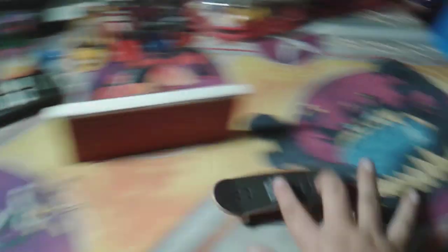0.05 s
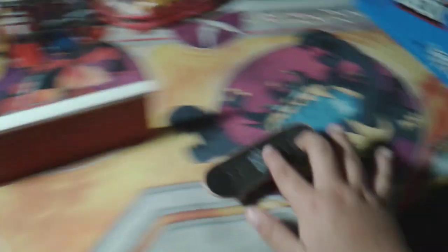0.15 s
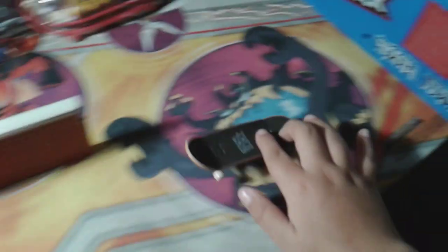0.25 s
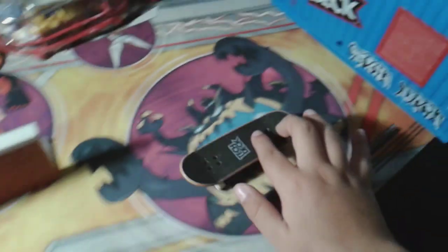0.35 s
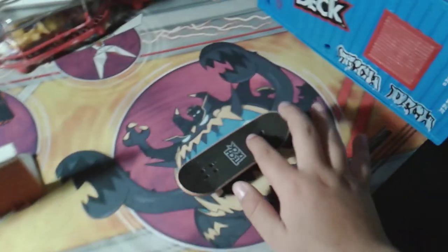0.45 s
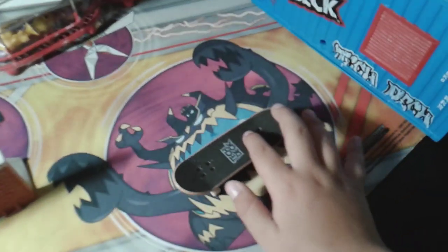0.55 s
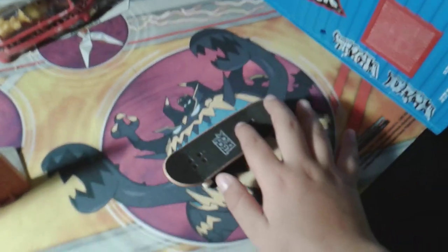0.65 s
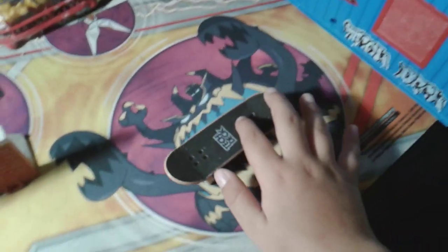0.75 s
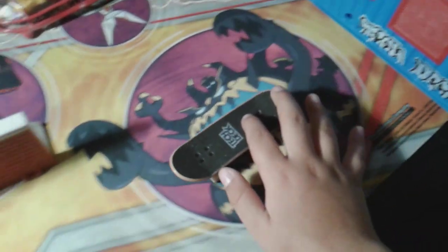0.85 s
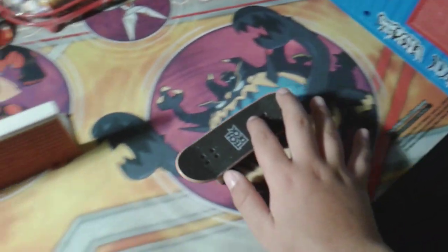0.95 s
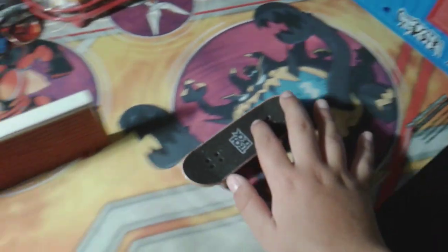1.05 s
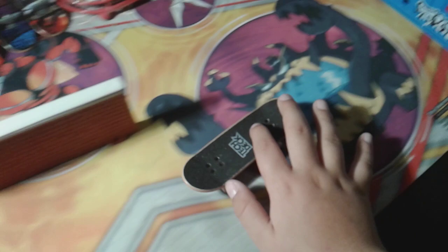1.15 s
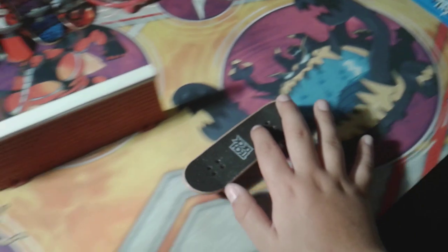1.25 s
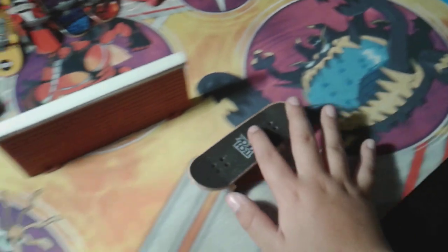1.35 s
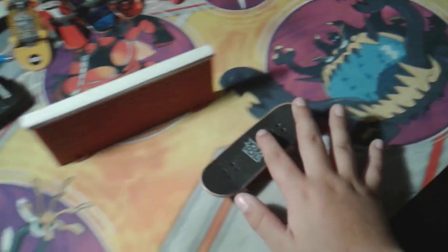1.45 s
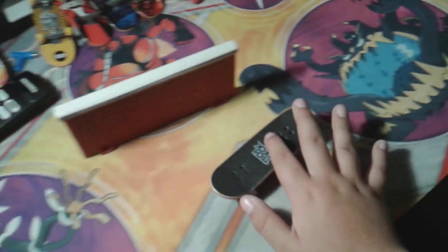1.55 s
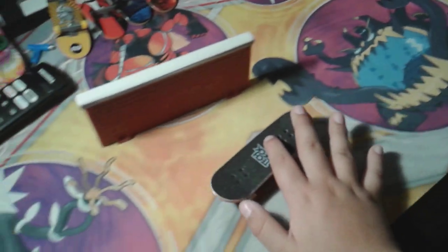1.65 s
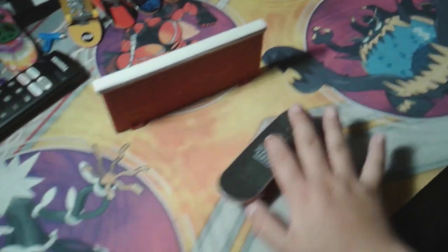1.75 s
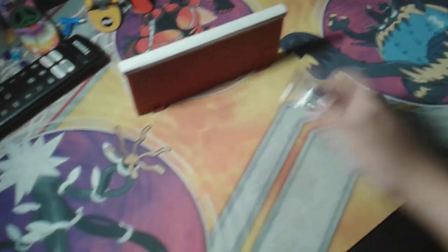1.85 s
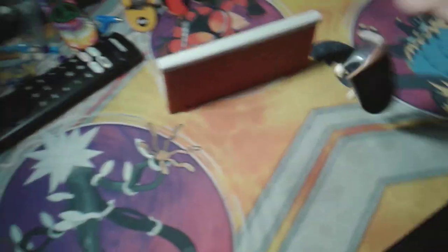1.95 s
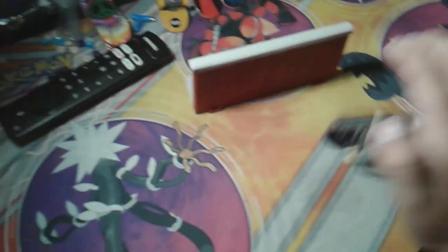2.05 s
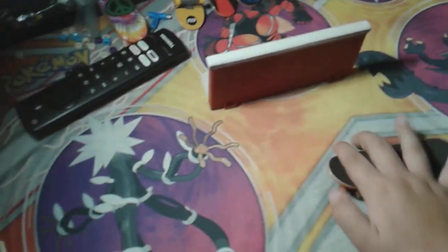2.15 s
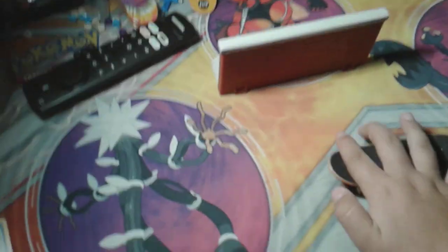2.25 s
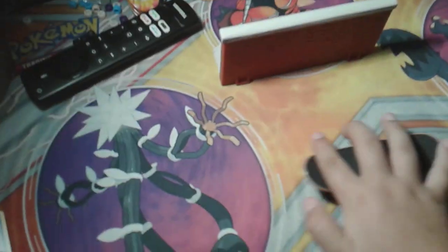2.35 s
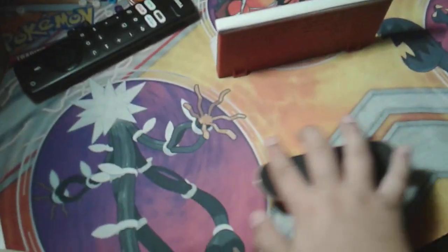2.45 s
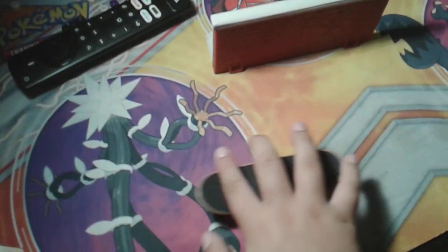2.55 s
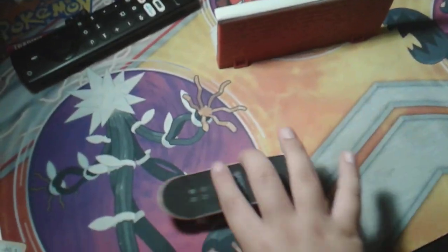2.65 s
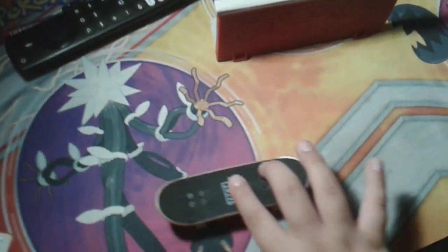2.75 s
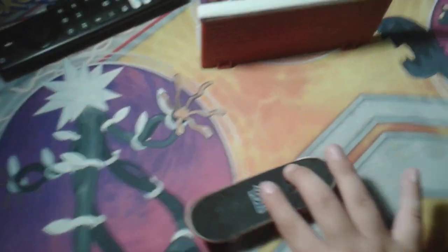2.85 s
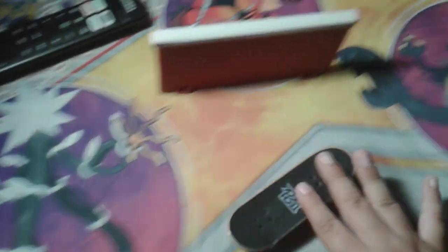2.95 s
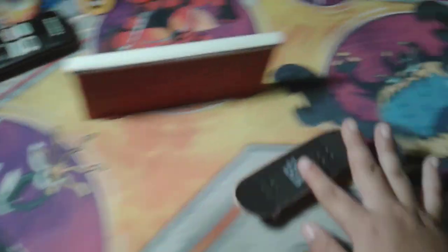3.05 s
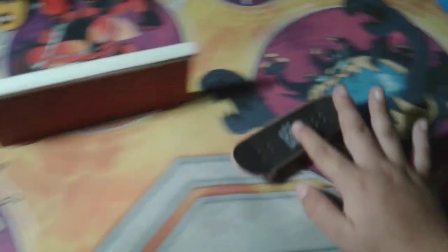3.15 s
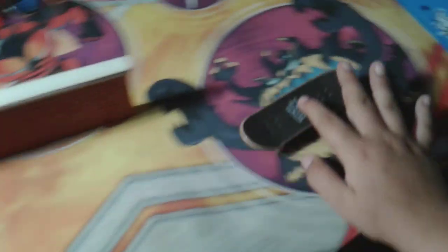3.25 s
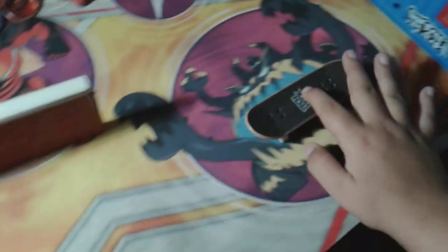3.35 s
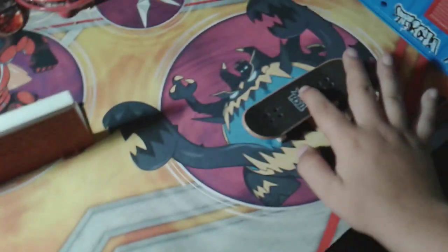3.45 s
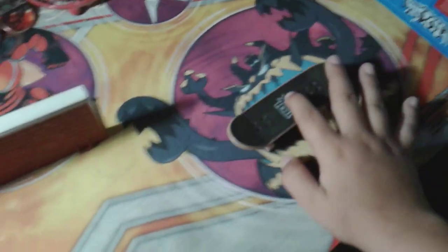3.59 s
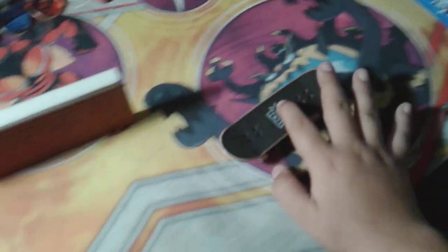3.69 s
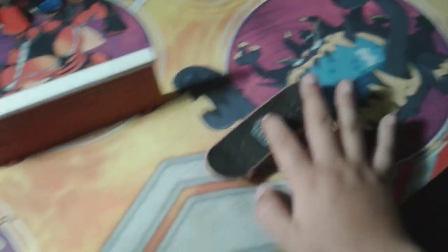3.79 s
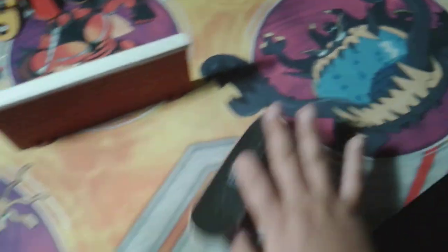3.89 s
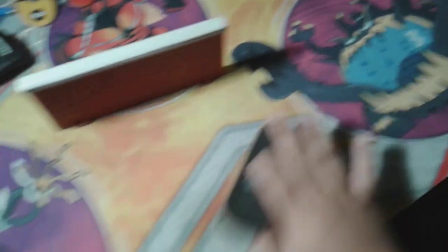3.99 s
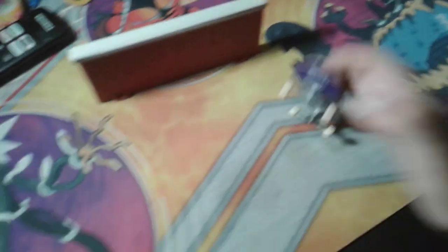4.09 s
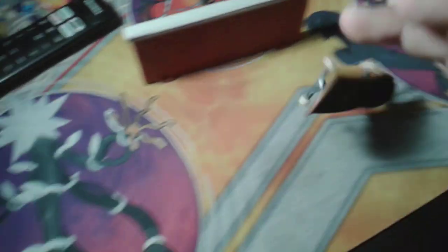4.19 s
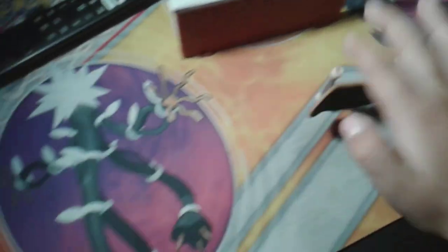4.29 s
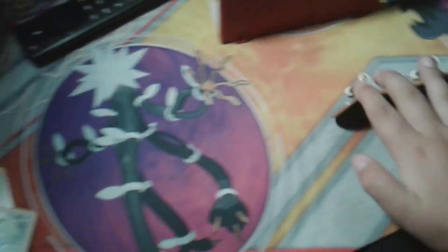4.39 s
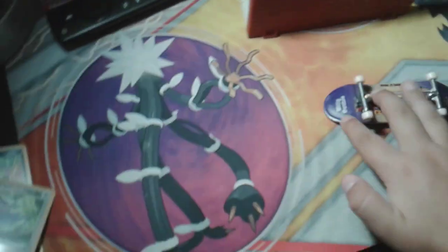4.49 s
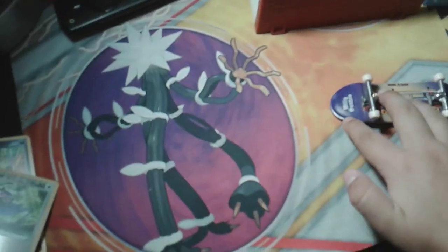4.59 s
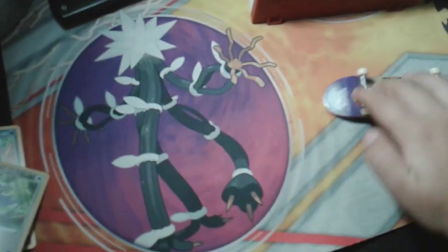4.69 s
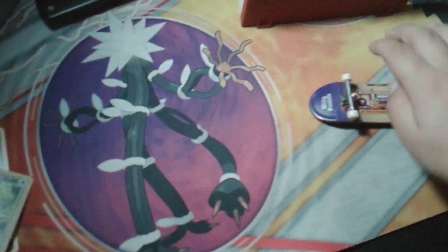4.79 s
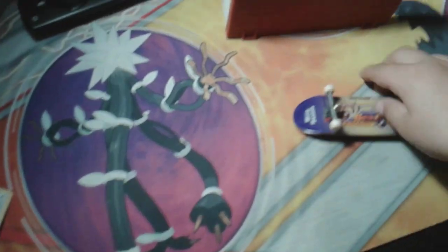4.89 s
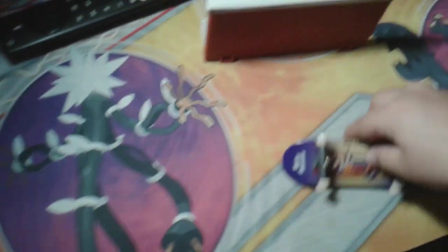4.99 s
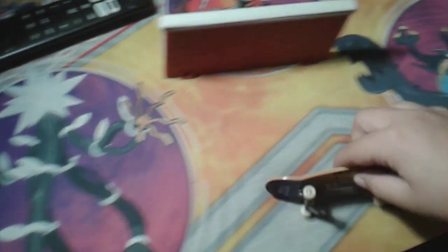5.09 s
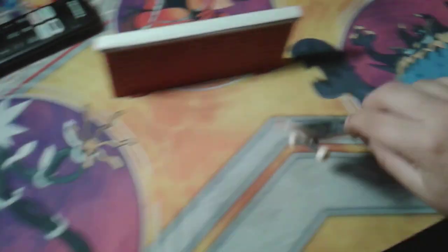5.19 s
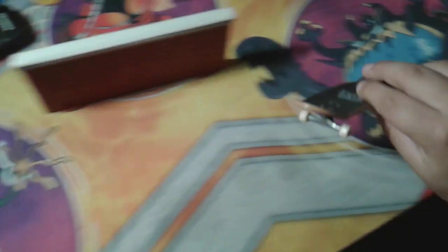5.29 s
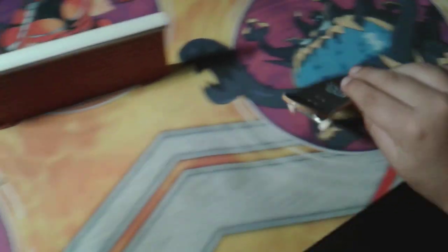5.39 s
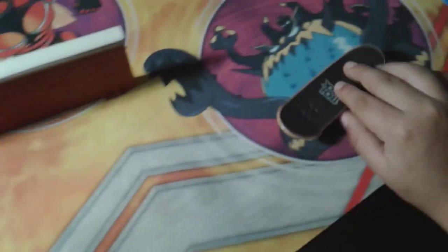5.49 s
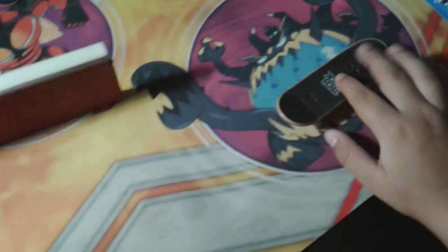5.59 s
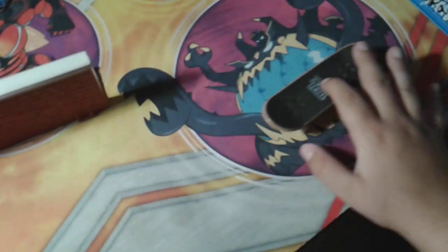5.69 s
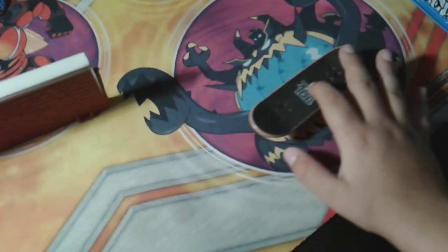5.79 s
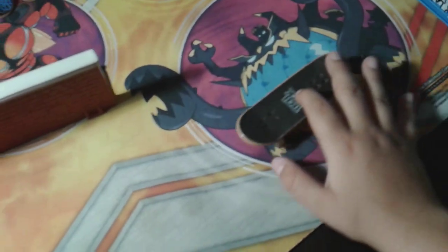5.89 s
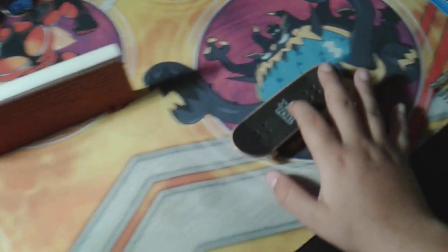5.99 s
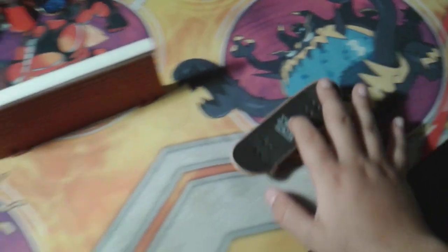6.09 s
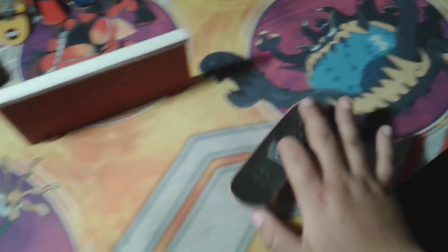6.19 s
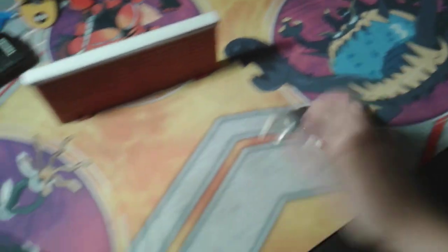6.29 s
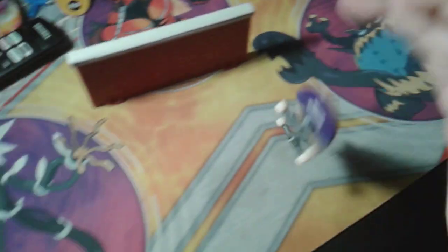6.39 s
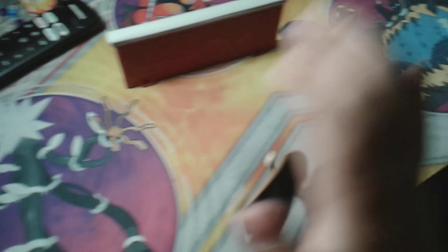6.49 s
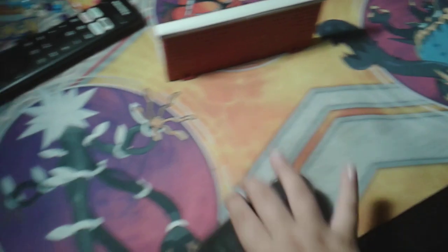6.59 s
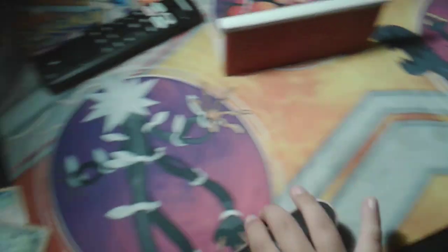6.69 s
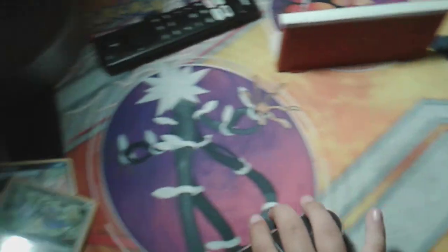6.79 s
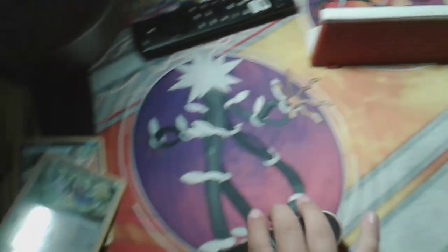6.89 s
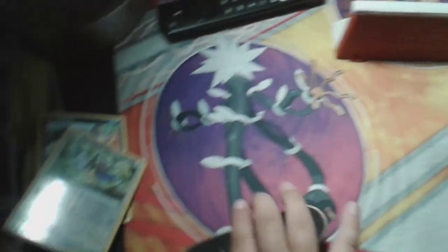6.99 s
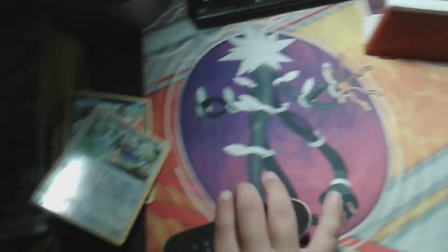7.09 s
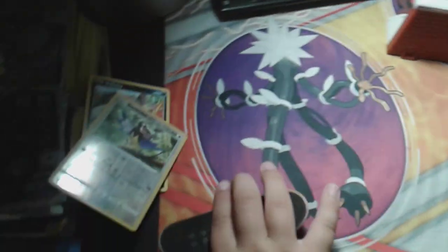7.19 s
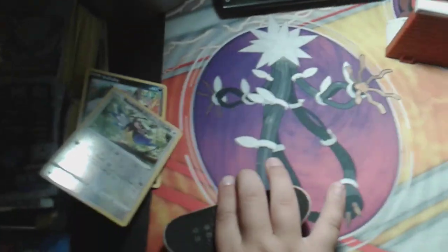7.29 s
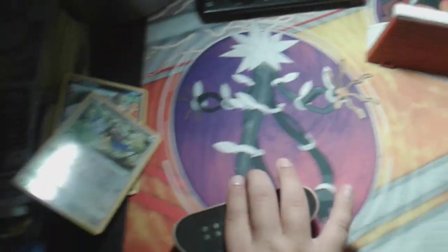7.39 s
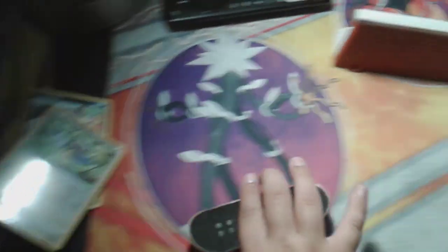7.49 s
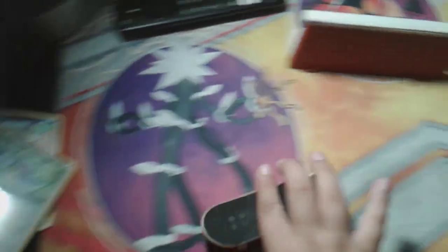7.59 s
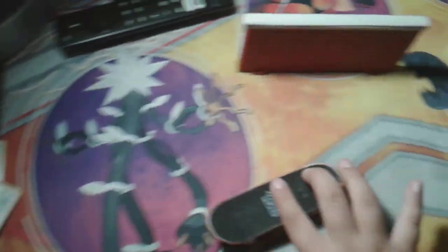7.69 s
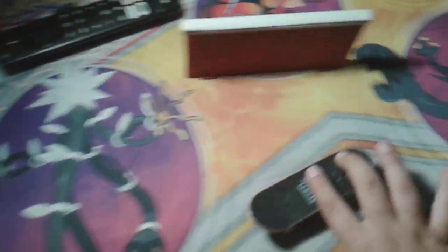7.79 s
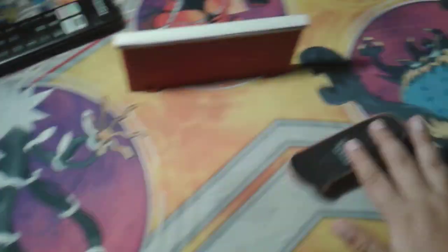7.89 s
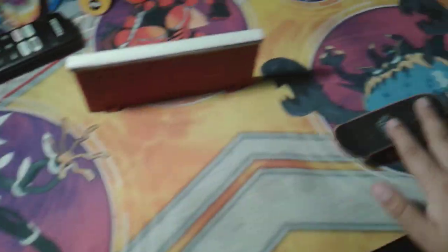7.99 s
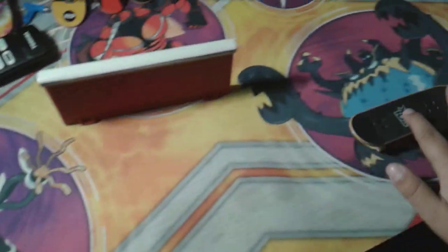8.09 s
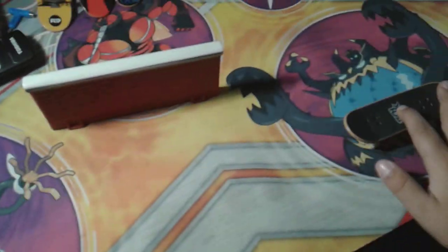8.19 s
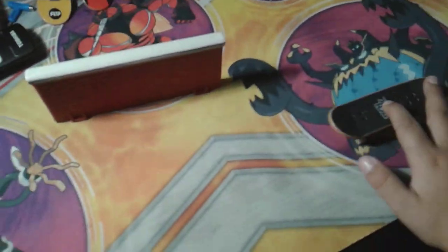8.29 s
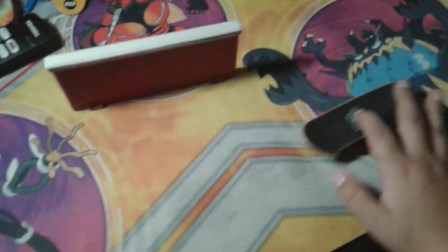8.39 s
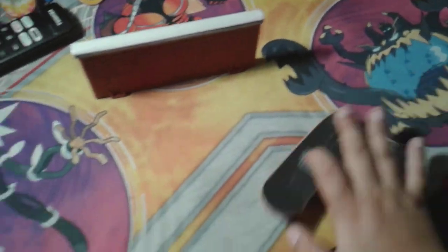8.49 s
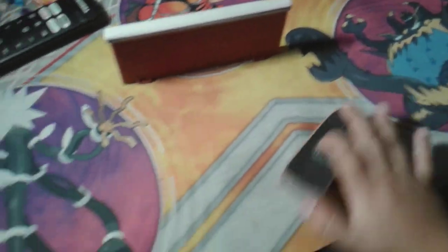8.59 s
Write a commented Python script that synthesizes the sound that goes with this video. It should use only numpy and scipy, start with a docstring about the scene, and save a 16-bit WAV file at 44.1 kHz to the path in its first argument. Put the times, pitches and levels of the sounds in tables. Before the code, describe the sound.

A tiny finger-sized skateboard rolls, scuffs and clacks on a cloth-covered table, with sharp flip landings and quiet wheel whirr in a small room.

```python
"""A small quiet room: a fingerboard is rolled and flipped on a cloth mat on a table, close to the microphone.
Tail pops and landings excite the decaying modes of the table top, a low thud under the clack of the
wooden deck and loose metal trucks, which are bursts of tiny contacts sent through resonances.
Between tricks the little wheels whirr over the mat and the board scuffs under the fingers, built from
resonant grains and noise; a short room echo, soft hiss and a low drone lie around it all."""
import sys
import numpy as np
from scipy import signal
from scipy.fft import rfft, irfft, next_fast_len
from scipy.io import wavfile

SR = 44100
rng = np.random.default_rng(int(sys.argv[2]) if len(sys.argv) > 2 else 0)


def dump_mix(stems):
    """Bounce the given channels to the path in sys.argv[1] as a 16-bit WAV at rate SR."""
    frames = np.atleast_2d(stems).T  # one column per channel
    limited = np.clip(frames, -1, 1)  # hard clip at full scale
    pcm = np.round(limited * 32767).astype(np.int16)
    wavfile.write(sys.argv[1], SR, pcm)


N = 381465
TIME = np.arange(N) / SR
HIT_TIME = np.arange(SR // 3) / SR   # time axis of one hit or echo, s

# the board hits the table in a pop or a landing; cushion is how far the mat holds the slap below the boom:
# (start_s, boom_db, cushion_db, wheels_db, deck_db, trucks_db)
BLOWS = [(0.459, -46.5, 13.5, -61, -55, -54.5), (0.5, -53.5, 13, -68, -71, -71),
         (1.532, -52, 23, -67, -76, -72), (1.9382, -42, 16.5, -48, -59.5, -58.5),
         (2.152, -40, 15, -55, -75, -51.5), (2.182, -32.5, 9.5, -44.5, -38.5, -33),
         (2.2421, -38.5, 15, -43.5, -41.5, -34), (4.152, -46, 12.5, -52, -58.5, -53),
         (4.321, -44, 13.5, -55, -64, -54.5), (4.3537, -32.5, -0.5, -40.5, -41, -36),
         (4.4374, -29.5, 2, -35, -36, -25), (4.56, -46, 24, -61, -60, -53),
         (4.959, -40.5, 42, -66.5, -69, -64.5), (5.52, -54, 13.5, -63, -57.5, -51),
         (5.593, -47, 13.5, -58.5, -58, -48.5), (6.4035, -41.5, 13.5, -63, -56, -52),
         (6.602, -38, 17, -55.5, -57.5, -48.5), (6.652, -34, 12, -50.5, -42.5, -41),
         (6.7217, -31.5, 6.5, -34.5, -33, -33), (8.054, -44.5, 20.5, -51.5, -68, -54),
         (8.073, -49.5, 22, -62, -61, -55)]
# resonances of the axles and their small parts: (pitch_hz, width_hz, level_db)
AXLE_RESONANCES = [(3985, 580, -11), (4720, 450, -7.5), (5880, 490, -4.5), (6840, 617, 0), (7190, 630, -2),
                   (8170, 630, -15), (12650, 4100, -26)]


def from_db(db):
    """Decibels to gain."""
    return 10 ** (np.asarray(db) / 20)


def rms_one(x, size=None):
    """Scale so that the first `size` samples have rms 1."""
    return x / np.sqrt(np.mean(x[:size] ** 2) + 1e-20)


def add(out, start_s, x):
    """Mix x into out from start_s on."""
    at = max(round(start_s * SR), 0)
    out[at:at + len(x)] += x[:max(len(out) - at, 0)]


def colour(x, spectrum):
    """Give a noise a smooth spectrum, drawn through the listed points on a log frequency axis."""
    hz, db = np.transpose(spectrum)
    size = 2 * next_fast_len(len(x) // 2 + 1)
    bins_hz = np.maximum(np.fft.rfftfreq(size, 1 / SR), 1)
    gain = from_db(np.interp(np.log(bins_hz), np.log(hz), db))
    return irfft(rfft(x, size) * gain)[:len(x)]


def drift(rate_hz):
    """Smoothly joined random values around zero, rate_hz of them per second."""
    knots = rng.standard_normal(N // 20)
    return np.interp(TIME * rate_hz, np.arange(len(knots)), knots)


def resonate(x, body, vary_db=0):
    """Parallel resonances; where the body is touched changes the strength of each."""
    out = 0
    for k, (hz, width_hz, db) in enumerate(body):
        radius = np.exp(-np.pi * width_hz / SR)
        angle = 2 * np.pi * hz / SR
        sign = (-1) ** k
        gain = sign * from_db(db + vary_db * rng.standard_normal()) * (1 - radius ** 2) / 2
        poles = [1, -2 * radius * np.cos(angle), radius ** 2]
        out = out + gain * signal.lfilter([1, 0, -1], poles, x + 1e-18)
    return out


def high_pass(x, hz):
    """Small parts radiate no bass."""
    return signal.sosfilt(signal.butter(3, min(hz, .45 * SR), "high", fs=SR, output="sos"), x)


def band_pass(x, low_hz, high_hz):
    """Each part radiates only over its own range."""
    edges_hz = [low_hz, min(high_hz, .45 * SR)]
    return signal.sosfilt(signal.butter(3, edges_hz, "band", fs=SR, output="sos"), x)


def grains(per_s, spread_db, size):
    """Tiny contacts at random moments, of uneven force."""
    force = from_db(spread_db * np.minimum(rng.exponential(1, size), 4))
    happens = rng.random(size) < per_s / SR
    return happens * force * rng.choice([-1, 1], size)


def thuds():
    """Everything that shakes the table: (start_s, boom_db, cushion_db)."""
    # fingers press the board into the mat with a dull thump: (start_s, boom_db)
    presses = [(1.422, -58.5), (1.56, -54.5), (2.841, -55.5), (5.628, -49.5), (7.069, -59), (7.562, -56),
               (7.793, -53), (7.976, -48)]
    lag_s = .002   # the table top gives way just after the wheels touch
    press_cushion_db = 29
    blows = [(s + lag_s, boom, cushion) for s, boom, cushion, *_ in BLOWS]
    return blows + [(s, boom, press_cushion_db) for s, boom in presses]


def ring_share(start_s):
    """Share of the table's full ring time: the weight of the holding fingers shortens it."""
    tumbles_freely = 3.9 < start_s < 4.5   # one flip without hands
    return 1.05 if tumbles_freely else 0.83


def table(vary_db=4.0, swell_s=0.0051, thud_db=-2.5, thud_t60_s=.075, knock_trim_db=1.5):
    """The mat cushions each blow on the table top; the less it cushions, the louder the higher modes."""
    # modes of the table top; ring_share scales the ring time: (pitch_hz, level_db, t60_s)
    table_modes = [(110.8, -1, 0.094), (128.4, -5.5, .19), (167, -20, .1), (248, -20.5, 0.057),
                   (320.5, -3, 0.15), (345, -0.5, 0.071), (400.4, 3, .06), (440, -0.5, 0.091),
                   (615, -9, 0.26), (747, 0, 0.069), (778.4, 2, 0.071), (844, -2.5, 0.1), (929, -1, 0.08),
                   (1068, -7.5, .07), (1275, -6.5, .06)]
    knock_share = .72   # share of the cushioning that the middle modes feel
    out = np.zeros(N)
    hz, level_db, t60_s = np.transpose(table_modes)[:, :, None]
    swell = (1 - np.exp(-HIT_TIME * hz / (swell_s * hz[0]))) ** 2   # low modes swell more slowly
    waves = np.sin(2 * np.pi * hz * HIT_TIME) * swell
    register = np.digitize(hz[:, 0], [220, 570])   # 0 boom, 1 knock, 2 slap
    for start_s, boom_db, cushion_db in thuds():
        fall_db = -60 * HIT_TIME / ring_share(start_s)   # still to be divided by a t60
        struck = waves * from_db(level_db + fall_db / t60_s + vary_db * rng.standard_normal(hz.shape))
        boom = rms_one(struck[register == 0].sum(0), size=SR // 40)
        add(out, start_s, from_db(boom_db) * boom)
        knock_db = boom_db - knock_share * cushion_db + knock_trim_db
        slap_db = boom_db - cushion_db
        upper = [(1, knock_db, 305, 520), (2, slap_db, 680, 1300)]
        for k, db, low_hz, high_hz in upper:
            # a crowd of heavily damped modes fills the gaps between the clear ones
            noise = rng.standard_normal(len(HIT_TIME)) * from_db(fall_db / thud_t60_s)
            thud = rms_one(band_pass(noise, low_hz, high_hz))
            clear = rms_one(struck[register == k].sum(0))
            body = clear + from_db(thud_db) * thud
            add(out, start_s, from_db(db) * rms_one(body, size=SR // 55))
    return high_pass(out, hz=45)   # the table top is too small to radiate deep bass


def loose_deck(start_s=4.44, pitch_hz=327, peak_db=-30, t60_s=0.3):
    """Landing with no hand on it, the deck is free to ring in its first bending mode."""
    out = np.zeros(N)
    ring = np.sin(2 * np.pi * pitch_hz * HIT_TIME)
    add(out, start_s, ring * from_db(peak_db - 60 * HIT_TIME / t60_s))
    return out


def clacks():
    """Everything that shakes the board: (start_s, wheels_db, deck_db, trucks_db, truck_lag_s)."""
    # the loose trucks clack without a blow on the table: (start_s, trucks_db)
    board_clacks = [(0.205, -66.5), (0.242, -65), (0.528, -63), (0.541, -73), (0.804, -68.5), (1.417, -72),
                    (1.556, -70.5), (1.999, -64.5), (2.014, -68), (2.1722, -53), (2.226, -49.5),
                    (2.26, -46.5), (2.2993, -56), (2.465, -71), (3.075, -68), (4.0, -64), (4.219, -62.5),
                    (4.428, -44), (4.521, -50.5), (4.5448, -49), (4.599, -57), (5.024, -65), (5.133, -67.5),
                    (5.164, -63), (5.248, -74), (5.48, -61), (5.6382, -55), (6.325, -69), (6.455, -61),
                    (6.648, -52), (6.674, -43.5), (6.699, -52.5), (6.712, -40.5), (6.7365, -37),
                    (6.7877, -56.5), (6.8195, -58.5), (6.86, -61.5), (6.9547, -62.5), (7.529, -74.5),
                    (7.893, -68), (8.145, -72.5), (8.55, -69), (8.591, -63)]
    # the harder the blow, the sooner the loose trucks follow the wheels: (trucks_db, lag_s)
    truck_lag = [(-56.5, 0.0025), (-38, 0.00065)]
    shared_db = -9   # a clack without a blow reaches wheels and deck only weakly
    lag_db, lag_s = np.transpose(truck_lag)
    blows = [(s, wheel, deck, truck, np.interp(truck, lag_db, lag_s))
             for s, _, _, wheel, deck, truck in BLOWS]
    loose = [(s, db + shared_db, db + shared_db, db, lag_s[-1]) for s, db in board_clacks]
    return blows + loose


def board(rattle_s=0.0037, rise_s=0.00086, settle_db=-24, settle_s=.016, crack_db=-5.5):
    """A clack is a burst of contacts: wheels and deck, the loose trucks just after, then faint chatter."""
    # knock of a wheel against its axle: (pitch_hz, width_hz, level_db)
    wheel_knock = [(1680, 400, -3), (1924, 210, -2.5), (2248, 290, -2.5)]
    # resonances of the wooden deck: (pitch_hz, width_hz, level_db)
    deck_resonances = [(2600, 290, 5.5), (3296, 270, 3.5), (4000, 450, -3)]
    # resonances of the metal trucks: (pitch_hz, width_hz, level_db)
    truck_resonances = [(5240, 460, -7.5), (5730, 430, -7), (6340, 450, 0), (6960, 610, 0), (7460, 400, 1),
                        (8600, 610, -12.5)]
    # bright edge from the trucks' small parts: (pitch_hz, width_hz, level_db)
    edge_resonances = [(9500, 1400, -5), (12120, 2800, -8.5), (13700, 1200, -13.5), (15300, 1000, -8.5)]
    # (resonances, low_hz, high_hz, share of the trucks' lag)
    parts = [(wheel_knock, 1400, 2500, 0), (deck_resonances, 2400, 4700, 0),
             (truck_resonances, 4800, 9200, 1), (edge_resonances, 9000, 17500, 1)]
    # under a firm clack of the trucks the edge lies edge_below_db lower; edge_growth is dB gained per dB of force
    firm_db, edge_below_db, edge_growth = -44, 13.5, .2
    out = np.zeros(N)
    t = HIT_TIME[:SR // 8]
    burst = (1 - np.exp(-t / rise_s)) * np.exp(-t / rattle_s)
    settle = from_db(settle_db) * np.exp(-t / settle_s)
    for start_s, wheel_db, deck_db, truck_db, lag_s in clacks():
        edge_db = truck_db + edge_growth * (truck_db - firm_db) - edge_below_db
        contacts = burst * grains(per_s=20000, spread_db=-1.5, size=len(t))
        contacts = contacts + settle * grains(per_s=1500, spread_db=6.0, size=len(t))
        levels_db = wheel_db, deck_db, truck_db, edge_db
        for db, (body, low_hz, high_hz, lag_share) in zip(levels_db, parts):
            ring = rms_one(band_pass(resonate(contacts, body, vary_db=0.5), low_hz, high_hz))
            # the surfaces also grate directly, without ringing
            crack = rms_one(band_pass(contacts * rng.standard_normal(len(t)), low_hz, high_hz))
            clack = rms_one(ring + from_db(crack_db) * crack, size=SR // 125)
            add(out, start_s + lag_share * lag_s, from_db(db) * clack)
    return out


def wheels(whirr, hiss, rumble, uneven_db, grit_db=4.0, wander=.07):
    """Wheels tick unevenly over the mat's weave; finger pressure makes axle hiss and table rumble flutter."""
    # resonances of the little wheels: (pitch_hz, width_hz, level_db)
    wheel_resonances = [(1110, 1400, -12.5), (1680, 320, -5), (1905, 130, -3), (2280, 300, -6.5),
                        (2775, 420, -11.5), (4025, 400, -18.5)]
    # table under rolling wheels: (pitch_hz, level_db per Hz)
    rumble_spectrum = [(30, -34), (60, -14), (105, 0), (160, -1.5), (230, -16.5), (330, -14), (600, -24.5),
                       (1100, -30), (2000, -48)]
    pressure = from_db(uneven_db * drift(130))
    ticks = from_db(grit_db * drift(60)) * grains(per_s=2000, spread_db=3.5, size=N)
    weave = rms_one(high_pass(resonate(ticks, wheel_resonances), hz=686))
    # the whirr wanders in pitch
    read_at = np.cumsum(1 + wander * drift(25)) % N
    weave = np.interp(read_at, np.arange(N), weave)
    rubs = pressure * grains(per_s=1400, spread_db=2.5, size=N)
    chafe = rms_one(high_pass(resonate(rubs, AXLE_RESONANCES), hz=3240))
    boom = rms_one(colour(pressure * rng.standard_normal(N), rumble_spectrum))
    return whirr * weave + hiss * chafe + rumble * boom


def rolling(whirr_trim_db=-0.5, hiss_trim_db=1.5, rumble_db=-57, rumble_power=0.42):
    """Each push speeds the board up and lets it run out; the table's rumble grows more slowly than the hiss."""
    # pushes over the mat, levels at the fastest moment before the trims:
    # (start_s, fastest_s, stop_s, wheel_whirr_db, axle_hiss_db)
    runs = [(-.25, 0.21, 0.4, -70.5, -71.5), (2.2, 2.56, 3.27, -80.5, -87.5),
            (2.979, 3.053, 3.534, -63.5, -65.5), (3.836, 4, 4.24, -64, -70), (6.047, 6.33, 8, -77.5, -85.5),
            (6.747, 7.02, 7.25, -76, -78), (7.077, 7.18, 7.29, -75, -71), (7.735, 7.889, 8.29, -67, -62),
            (7.837, 8.042, 8.15, -60.5, -62.5), (8.445, 8.611, 8.7, -60.5, -61)]
    speed_power = 1.48   # rolling noise grows with this power of the speed
    whirr, hiss = 0, 0
    for start_s, fastest_s, stop_s, whirr_db, hiss_db in runs:
        speed = np.interp(TIME, [start_s, fastest_s, stop_s], [0, 1, 0])
        swell = speed ** speed_power
        whirr = whirr + from_db(whirr_db + whirr_trim_db) * swell
        hiss = hiss + from_db(hiss_db + hiss_trim_db) * swell
    rumble = from_db(rumble_db) * (hiss / hiss.max()) ** rumble_power
    return wheels(whirr, hiss, rumble, uneven_db=3.0)


def skidding(attack_s=.005, release_s=.014, rumble_trim_db=-2.5):
    """A skid bites at once, holds while the fingers drag the board and dies away quickly."""
    # the board scrapes briefly over the mat, around a blow or as a roll ends; rumble before its trim:
    # (start_s, end_s, wheel_whirr_db, axle_hiss_db, table_rumble_db)
    skids = [(0.5, 0.528, -76, -67, -49), (1.988, 2.012, -88, -63, -51.5), (4.182, 4.225, -74, -73, -56),
             (4.506, 4.56, -65, -66, -54), (4.55, 4.576, -65, -51.5, -44),
             (4.964, 5.036, -71.5, -68, -55.5), (5.48, 5.512, -67.5, -62.5, -54),
             (5.605, 5.64, -72.5, -63, -47), (6.417, 6.468, -67.5, -63, -51.5),
             (8.611, 8.627, -55.5, -68, -52)]
    whirr, hiss, rumble = 0, 0, 0
    for start_s, end_s, whirr_db, hiss_db, rumble_db in skids:
        bite = np.clip((TIME - start_s) / attack_s, 0, 1)
        drag = bite * np.exp(-np.clip((TIME - end_s) / release_s, 0, 20))
        whirr = whirr + from_db(whirr_db) * drag
        hiss = hiss + from_db(hiss_db) * drag
        rumble = rumble + from_db(rumble_db + rumble_trim_db) * drag
    return wheels(whirr, hiss, rumble, uneven_db=5.0)


def chirps(slip_s=0.0022):
    """A dry axle chirps as the board first rolls off: each slip rings its two narrow resonances."""
    # moments of the slips: (start_s, level_db)
    axle_slips = [(.082, -58), (.094, -52.5), (.104, -58), (.109, -61), (0.121, -65), (.134, -68),
                  (.160, -67)]
    # the squeaking axle: (pitch_hz, width_hz, level_db)
    squeak = [(5860, 500, -2), (6830, 350, 0)]
    out = np.zeros(N)
    t = HIT_TIME[:SR // 50]
    for start_s, db in axle_slips:
        slip = rng.standard_normal(len(t)) * np.exp(-t / slip_s)
        ring = high_pass(resonate(slip, squeak), hz=4500)
        add(out, start_s, from_db(db) * rms_one(ring, size=SR // 250))
    return out


def fidgets(slip_s=0.0035, force_spread_db=2.0):
    """Loose trucks tick faintly at uneven moments; each short slip has a force and colour of its own."""
    # the fingers shift their grip: (start_s, end_s, ticks_per_s, typical_tick_db)
    grip_shifts = [(1.824, 1.914, 55, -74.5), (2.49, 2.759, 38, -75), (3.635, 3.888, 22, -77),
                   (4.773, 4.831, 100, -77.5), (6.15, 6.307, 35, -79), (7, 7.224, 35, -75.5),
                   (7.545, 7.713, 45, -75.5)]
    out = np.zeros(N)
    t = HIT_TIME[:SR // 50]
    for start_s, end_s, per_s, db in grip_shifts:
        count = int(np.ceil(per_s * (end_s - start_s)))
        for tick_s in rng.uniform(start_s, end_s, size=min(count, 16)):
            slip = rng.standard_normal(len(t)) * np.exp(-t / slip_s)
            tick = high_pass(resonate(slip, AXLE_RESONANCES, vary_db=15.5), hz=2470)
            force = from_db(db + force_spread_db * rng.standard_normal())
            add(out, tick_s, force * rms_one(tick, size=SR // 200))
    return out


def room(x, first_s=0.00067, t60_s=0.27):
    """Dense reflections from nearby things and walls, as a decaying coloured noise."""
    # strength of the room's echo: (pitch_hz, level_db)
    echo_spectrum = [(60, -29.5), (130, -13.5), (320, -3), (800, -10), (2500, -13.5), (7000, -12),
                     (15000, -10)]
    onset = 1 - np.exp(-(HIT_TIME / first_s) ** 2)
    decay = from_db(-60 * HIT_TIME / t60_s) * onset
    echo = colour(rng.standard_normal(len(decay)), echo_spectrum) * decay / np.sqrt(np.sum(decay ** 2))
    return x + signal.fftconvolve(x, echo)[:N]


def still_air(hiss_db=-66, drone_db=-69):
    """Soft hiss from coloured noise and a low drone from noise through narrow resonances."""
    # still room: (pitch_hz, level_db per Hz)
    air_spectrum = [(25, -34.5), (40, -21), (58, 2), (100, -8), (165, -4), (200, -12.5), (330, -13.5),
                    (500, -21.5), (1000, -26.5), (2500, -31), (4800, -43), (6700, -38), (9000, -40.5),
                    (15500, -40)]
    # low drone of the room: (pitch_hz, width_hz, level_db)
    drone_resonances = [(57.6, 9.1, -12), (73, 12, -0.5), (116, 33, -7), (161, 14, -0.5), (248, 7.3, -9.5)]
    hiss = rms_one(colour(rng.standard_normal(N), air_spectrum))
    drone = rms_one(resonate(rng.standard_normal(N), drone_resonances))
    return from_db(hiss_db) * hiss + from_db(drone_db) * drone


def scene():
    """One microphone feeds both channels."""
    impacts = table() + loose_deck() + board()
    travel = rolling() + skidding()
    small_parts = chirps() + fidgets()
    mono = room(impacts + travel + small_parts) + still_air()
    return np.array([mono, mono])


def record(dry, cutoff_hz=15900, offset=-.0005):
    """The top is cut steeply; the converter sits slightly off zero."""
    steep_cut = signal.ellip(10, .2, 80, cutoff_hz, fs=SR, output="sos")   # .2 dB ripple, 80 dB stop
    return signal.sosfilt(steep_cut, dry) + offset


dry = scene()
out = record(dry)
dump_mix(out)
```